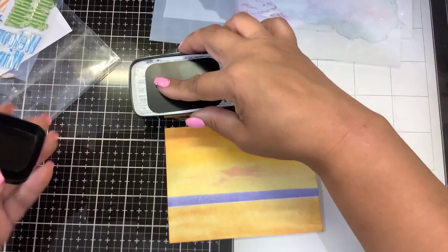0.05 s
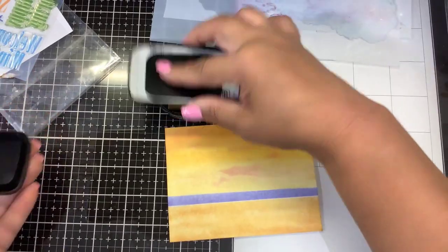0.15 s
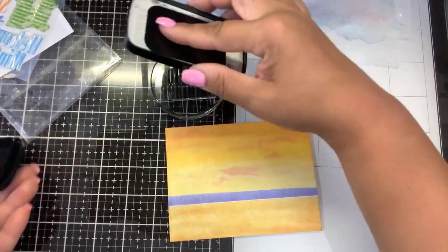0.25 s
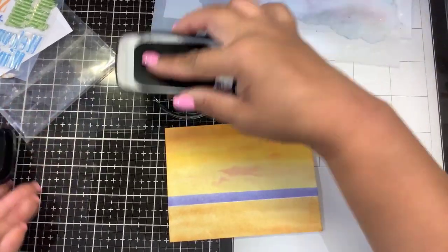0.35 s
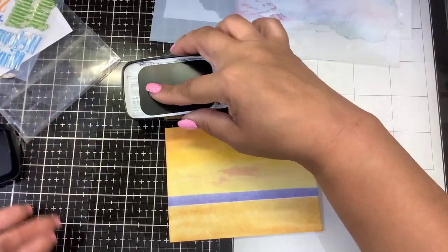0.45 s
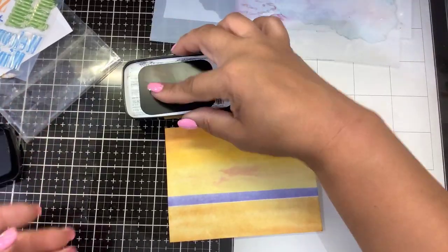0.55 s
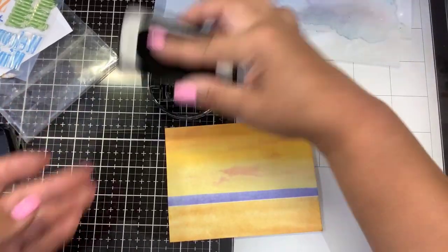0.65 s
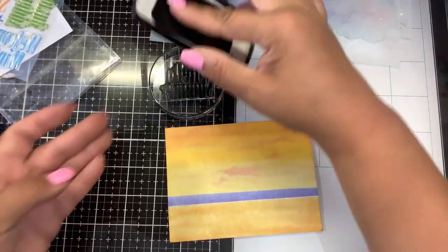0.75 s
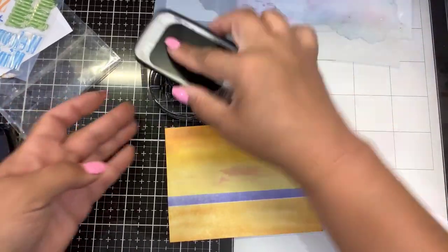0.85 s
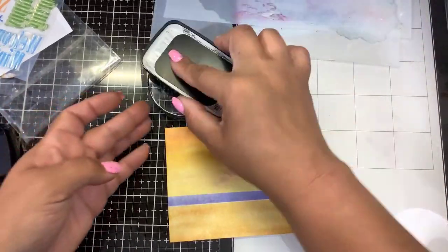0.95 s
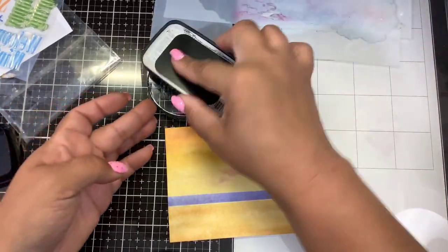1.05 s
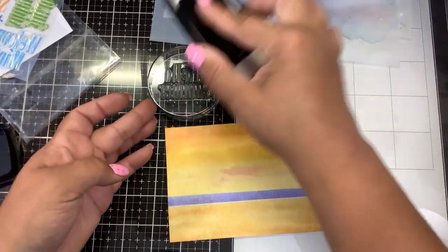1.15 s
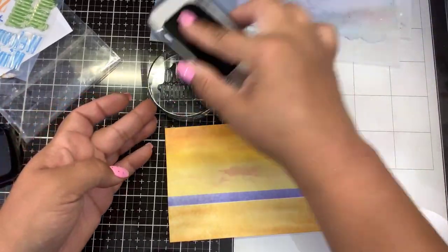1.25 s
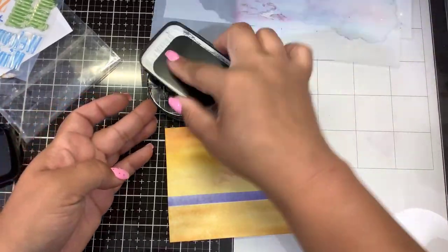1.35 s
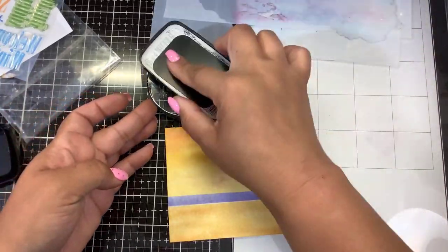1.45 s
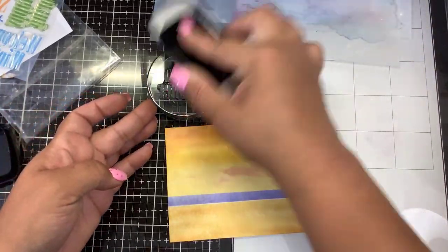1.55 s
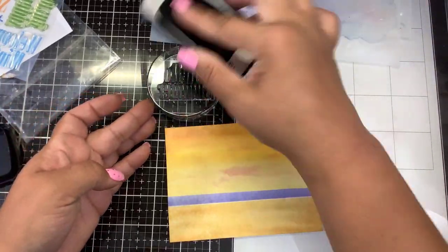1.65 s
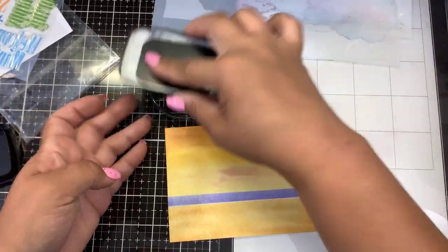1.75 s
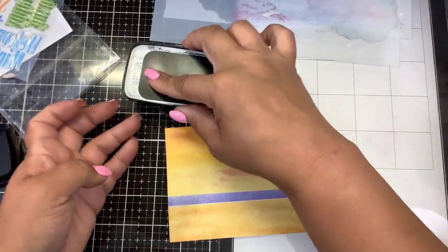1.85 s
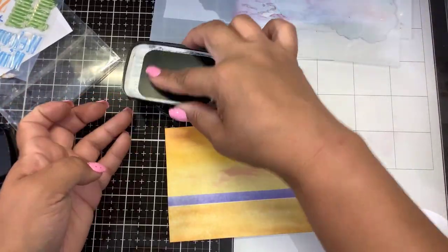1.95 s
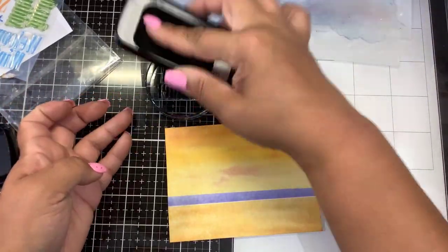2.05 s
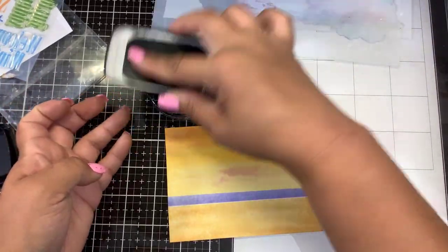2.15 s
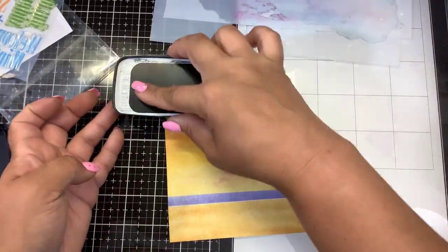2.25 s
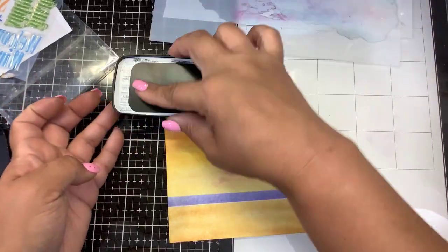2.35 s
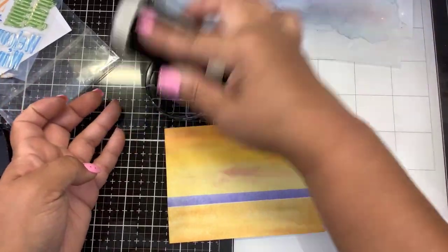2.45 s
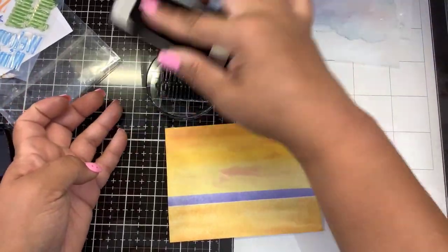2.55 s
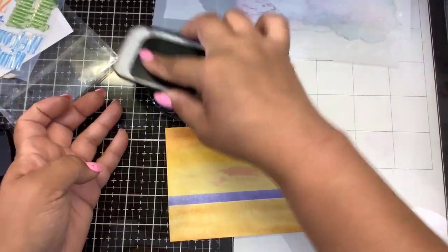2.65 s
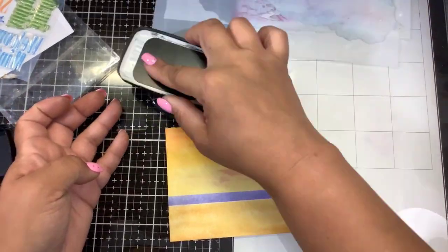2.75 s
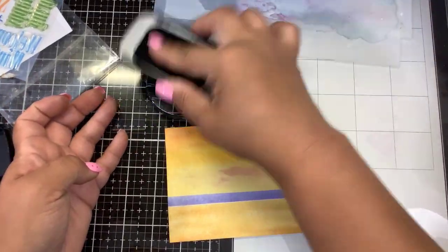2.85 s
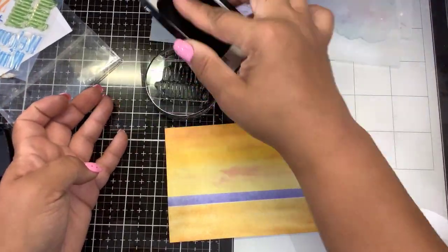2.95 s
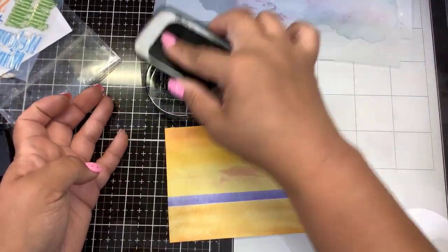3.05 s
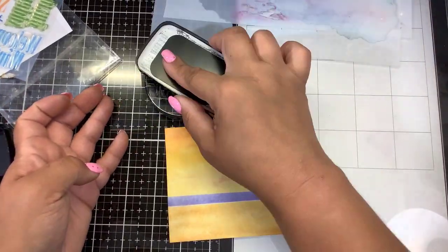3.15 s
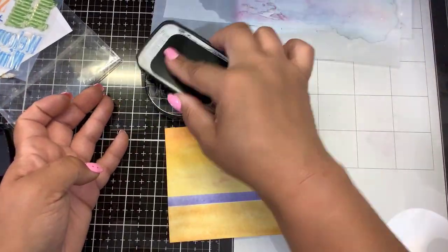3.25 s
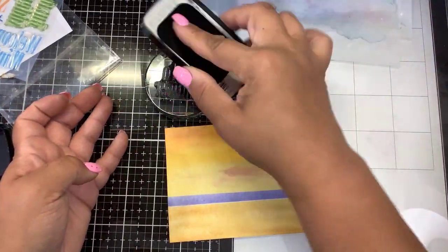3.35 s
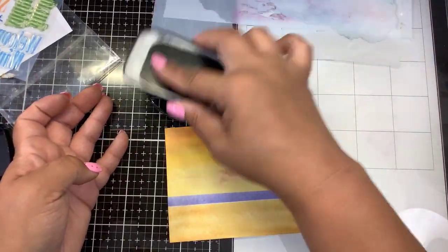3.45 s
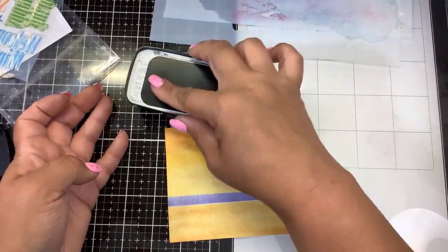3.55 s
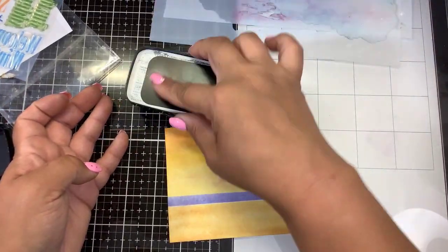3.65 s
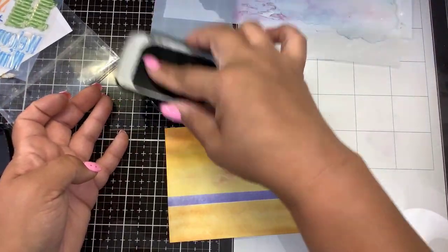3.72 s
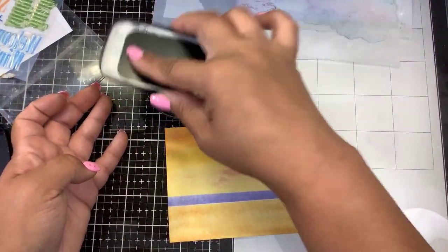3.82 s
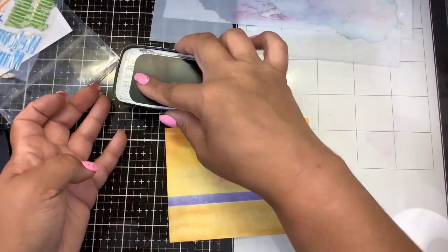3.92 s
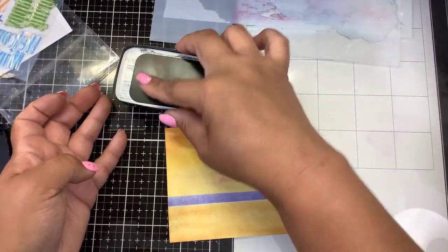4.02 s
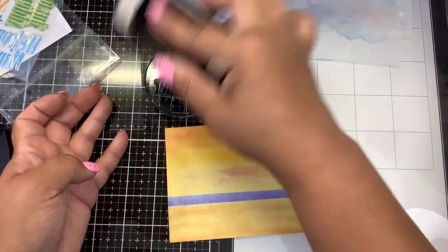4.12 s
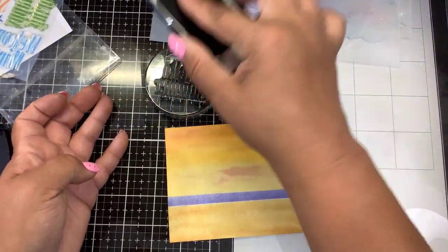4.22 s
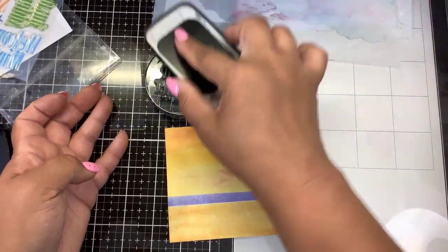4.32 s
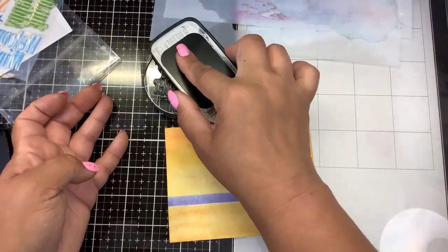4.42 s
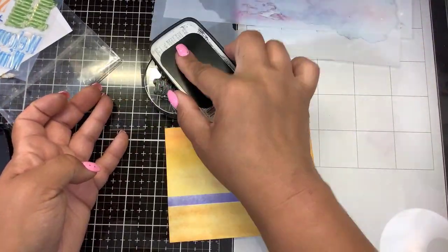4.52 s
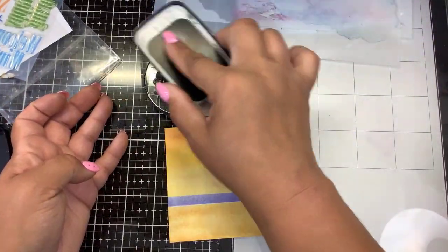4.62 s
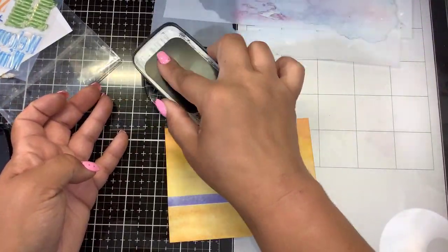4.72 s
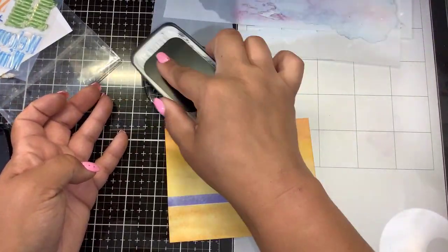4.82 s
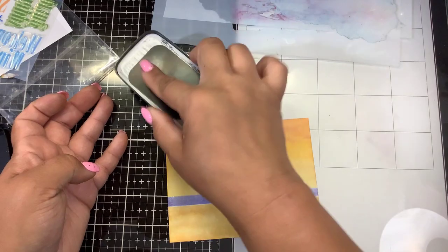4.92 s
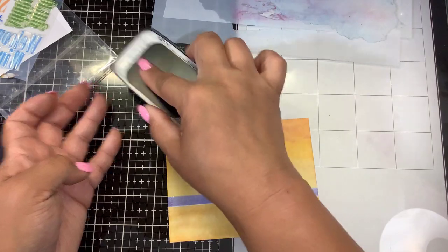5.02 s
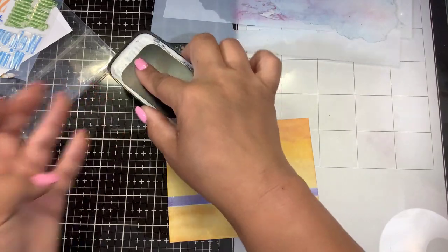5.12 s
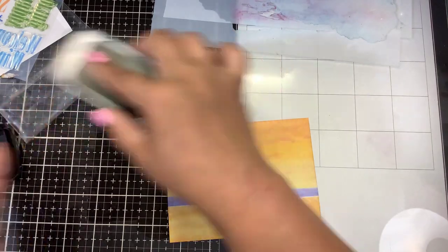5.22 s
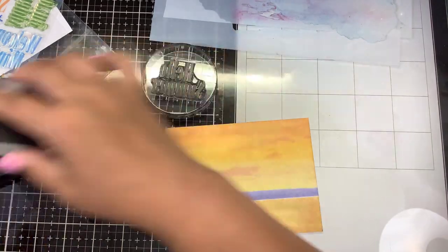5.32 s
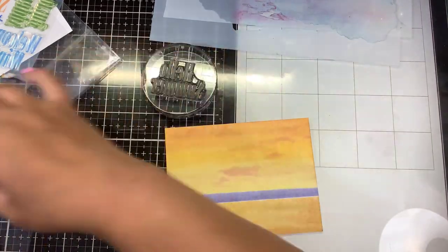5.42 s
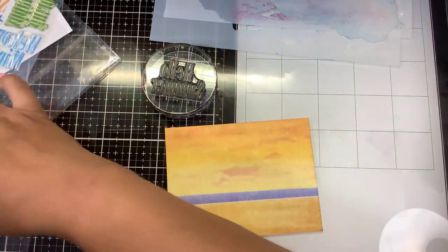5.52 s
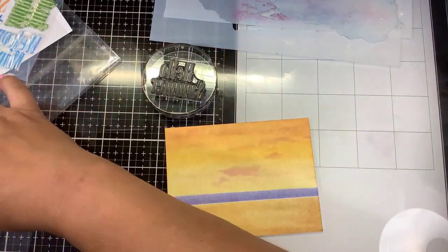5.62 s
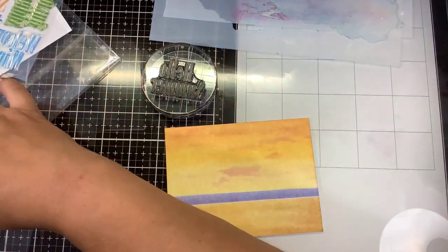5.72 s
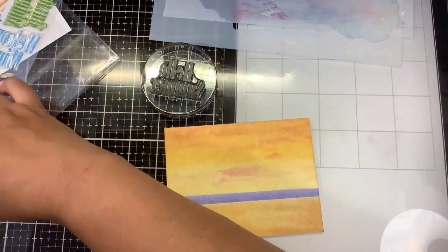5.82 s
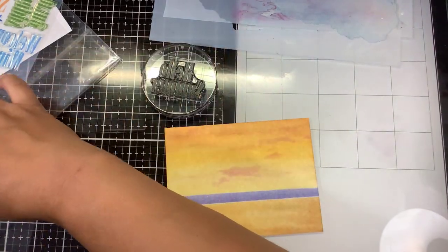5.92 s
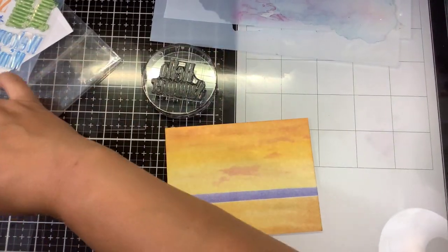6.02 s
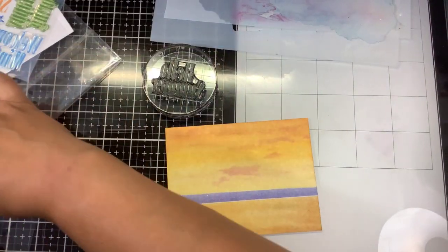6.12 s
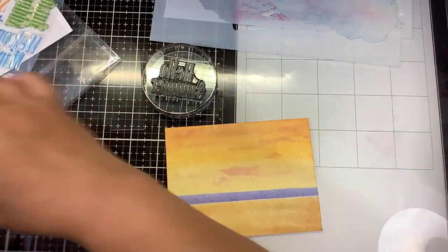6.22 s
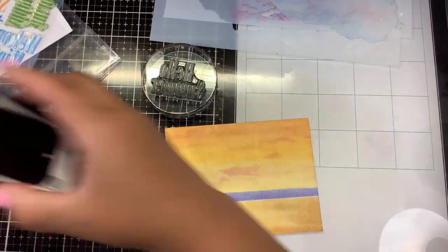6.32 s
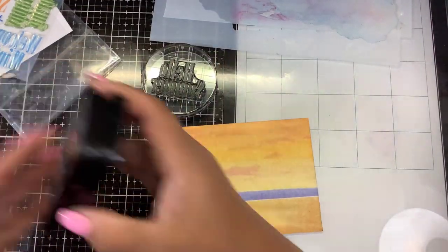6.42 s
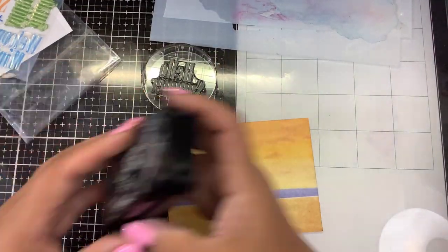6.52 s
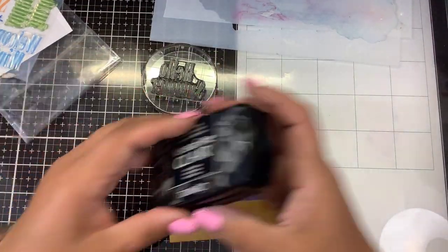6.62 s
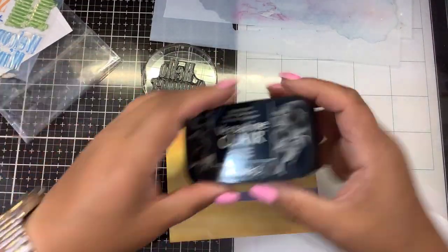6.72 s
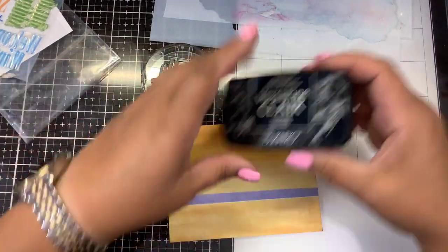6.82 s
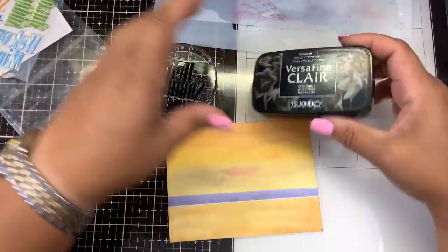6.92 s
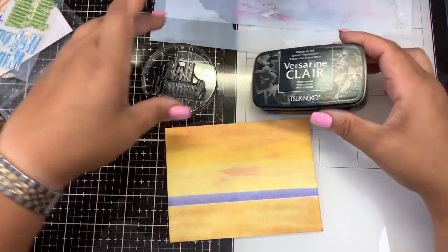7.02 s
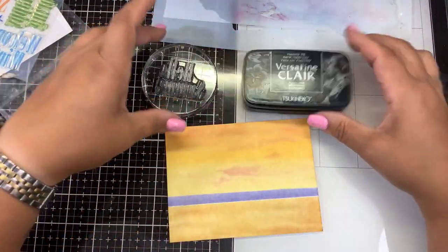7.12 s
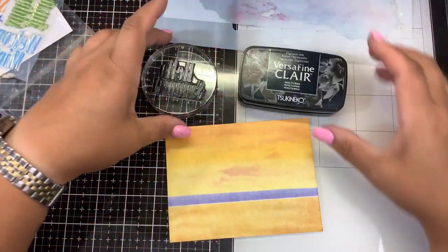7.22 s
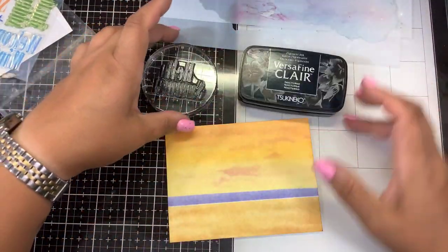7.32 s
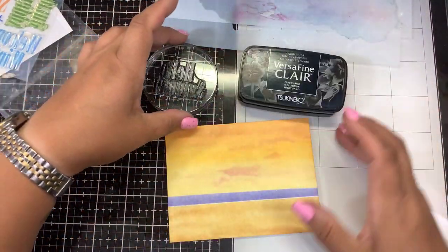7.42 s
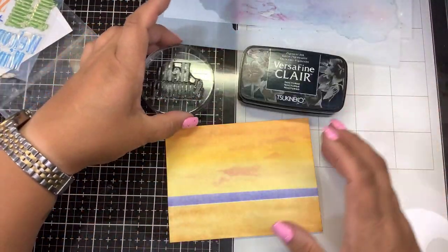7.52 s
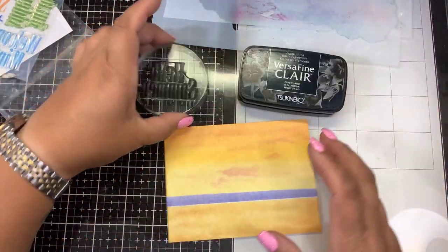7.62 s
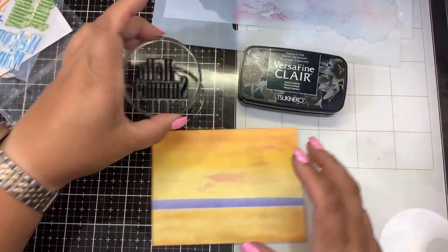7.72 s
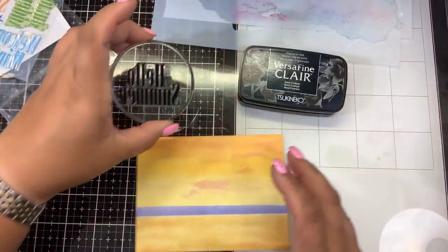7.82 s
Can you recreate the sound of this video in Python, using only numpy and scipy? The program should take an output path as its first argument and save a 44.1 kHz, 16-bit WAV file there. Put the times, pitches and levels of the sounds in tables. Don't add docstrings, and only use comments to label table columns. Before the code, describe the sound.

Soft dull thumps of an ink pad tapping a stamp twice a second, sticky little peels between, then plastic lid clicks and a loud clattering set-down.

```python
import sys
import numpy as np
from scipy import signal
from scipy.fft import rfft, irfft
from scipy.io import wavfile
from scipy.ndimage import uniform_filter1d

SR = 44100
rng = np.random.default_rng(int(sys.argv[2]) if len(sys.argv) > 2 else 0)


def to_linear_factor(level_db):
    exponent = np.asarray(level_db, float) / 20
    return 10 ** exponent


def file_out(sig):
    cols = np.atleast_2d(sig).T
    lim = np.clip(cols, -1, 1)
    pcm = np.round(lim * 32767).astype(np.int16)
    wavfile.write(sys.argv[1], SR, pcm)


N = 346925
T = np.arange(N) / SR

# frequency in Hz, level in dB per Hz.
AIR_COLOUR = [(15, -49.5), (25, -9), (118, -2.5), (142, -15.5), (167, -8.5), (187, -15), (321, -21),
              (524, -28), (669, -27.5), (1250, -29.5), (1360, -29.5), (4020, -34), (5130, -33),
              (15200, -30), (16500, -39.5)]
# start in seconds, thump in dB, hardness in dB per octave.
PAD_TAPS = [(0.0, -34, -4), (0.469, -24.5, -0.3), (0.958, -25, 0), (1.402, -31, -3), (1.842, -30, -1.2),
            (2.273, -26, 1), (2.721, -26.5, -2), (3.157, -30.5, -2.5), (3.543, -33.5, -2),
            (3.943, -22, -0.5), (4.433, -35, -5.7), (4.752, -17, 5), (4.97, -26, -1.5), (5.148, -29, -9.5),
            (5.168, -41, -12)]
# start in seconds, thump in dB, deep sway over thump in dB,
# hardness in dB per octave.
TABLE_JOLTS = [(0.305, -40.5, -20, -12), (1.199, -47.5, -8, -8.5), (1.934, -40.5, -30.5, 5),
               (5.199, -49, 10, -14), (5.8, -47, -9.5, -5), (5.873, -43, -9, 10), (5.963, -26, -25, -5),
               (5.983, -38.5, -25, -10), (7.019, -25, -34.5, 6.5), (7.042, -41.5, -11.5, -2.5),
               (7.189, -29, -23.5, -3), (7.227, -37, -8.5, -1.3), (7.261, -35.5, -13.5, -3),
               (7.701, -59.5, 11, 8.2)]
# frequency in Hz, level in dB, arrival of the crest in ms,
# sharpness as a bare exponent.
BENDING_WAVES = [(50.2, 0, 28, 1.9), (96.6, -10, 24, 3.4), (134.4, -2, 27, 2.3), (163.8, -4, 18, 2.4),
                 (202.3, -0.5, 20, 3.1), (243.7, 9, 10, 7.5), (262.6, -9, 31, 18), (302.6, 1.66, 7.5, 1.7),
                 (412, -6, 8, 2.1), (503, -7, 4.5, 3.1), (603.2, -14.5, 8, 1.2), (679, -14.5, 7, 1.2)]
# start in seconds, fizz in dB, case ring in Hz, length in seconds.
INK_PEELS = [(0.0897, -50, 722, 0.044), (0.136, -38.5, 990, 0.025), (0.1644, -40, 1440, 0.034),
             (0.6197, -39, 1370, 0.032), (1.1017, -44, 690, 0.031), (1.5334, -47.5, 1530, 0.039),
             (1.9959, -42.5, 1390, 0.036), (2.421, -41, 1476, 0.03), (2.8644, -44.5, 1366, 0.03),
             (3.3, -45.5, 1400, 0.024), (3.7144, -41, 1290, 0.019), (4.087, -38, 1200, 0.023),
             (4.5904, -50.5, 1030, 0.036), (4.8536, -43.5, 1480, 0.03), (5.036, -41, 1400, 0.037),
             (5.0844, -43, 705, 0.039), (5.1444, -46.5, 670, 0.065), (5.1971, -55.5, 1260, 0.046),
             (6.1344, -42.5, 690, 0.021), (6.3744, -46, 1270, 0.048), (6.4188, -37.5, 1300, 0.0247),
             (6.566, -50, 1200, 0.059), (6.8294, -50, 627, 0.021), (7.06, -49.5, 564, 0.11)]
# start in seconds, fizz in dB, case ring in Hz, length in seconds.
LID_SCRAPES = [
    (2.305, -58.5, 1670, 0.059),
    (4.742, -62, 882, 0.015),
    (4.858, -57, 1600, 0.033),
    (5.045, -45.5, 1420, 0.027),
    (5.153, -50, 756, 0.024),
    (5.611, -49.5, 730, 0.013),
    (5.772, -50, 704, 0.022),
    (6.14, -53, 740, .035),
]
# frequency in Hz, level in dB per Hz.
INK_COLOUR = [(1180, -15.5), (2000, -20), (3400, -8.5), (5880, -6.5), (9920, -7), (14900, -1), (16000, -26)]
# frequency in Hz, level in dB, 60 dB decay in seconds.
HOLLOW_MODES = [(395, -8.5, 0.062), (522, -0.5, .035), (660, 1, 0.026), (848, -2, 0.035),
                (1050, -4.5, 0.032)]
# frequency in Hz, level in dB, 60 dB decay in seconds.
SHELL_MODES = [(1340, -4.5, .04), (1600, -7.5, 0.028), (1850, -7, 0.024), (2098, -3, 0.028),
               (2300, -4.5, 0.022), (2707, -3, 0.025), (3050, -3.5, 0.027), (3354, -5, 0.018),
               (3910, -3.5, 0.0074)]
# frequency in Hz, level in dB, 60 dB decay in seconds.
BRACELET_MODES = [(4630, -14, .03), (6250, -1.5, 0.054), (7200, -2.5, 0.065), (8130, -1, 0.085),
                  (9950, -4, 0.051)]
# frequency in Hz, level in dB per Hz.
CRACK_COLOUR = [(2060, -32), (3500, -2.5), (4700, 0), (5210, 0), (7420, -3.5), (8340, -2.5), (9320, -2.5),
                (14400, -3.5), (15500, -6.5), (16700, -42)]
# start in seconds, shell in dB, hollow over shell in dB,
# crack over shell in dB, loudest shell pitch in Hz.
LID_CLACKS = [(0.2966, -6, -14.5, -2.5, 2300), (0.334, -8.5, -15, -2, 2200), (0.4442, -12, -9.5, 7, 2650),
              (5.622, -24, -12.5, -8.5, 1800), (5.655, -37, -6, -11.5, 1980), (5.7969, -22, 0.5, -4, 2200),
              (5.8727, -37.5, 11, -5.5, 1380), (5.9454, -28.5, -2, 5, 2680),
              (5.9547, -19.5, -15, -17, 1600), (5.96, -22.5, 4, -0.5, 2050),
              (5.9965, -31.5, -13, 14.5, 2870), (7.3689, -29, -11, 9.5, 2845)]
# start in seconds, shell in dB, hollow over shell in dB,
# crack over shell in dB.
CASE_NICKS = [(0.585, -52.5, -2, -11), (0.9203, -37, -5.5, 8), (1.0038, -46, 0.5, 4),
              (1.1909, -42.5, 5.5, -28), (1.6512, -46, -13, 7), (1.7496, -51, -5, 4.5), (1.924, -34, -5, 2),
              (2.0604, -61, 1, 4), (2.3964, -42.5, -6, 7), (2.4339, -52.5, 3, 5),
              (4.0465, -42.5, -9.5, -2.5), (4.7714, -46, -6.5, 14), (4.9706, -48.5, -1, 12.5),
              (5.1103, -34, -1.5, 1), (5.165, -59.5, 18.5, -3), (6.4916, -60.5, -9.5, 21.5),
              (6.7745, -56, -11, 10)]
# start in seconds, shell in dB, hollow over shell in dB,
# crack over shell in dB.
CASE_KNOCKS = [
    (0.9592, -43.5, 12, 8),
    (1.9892, -46.5, -6, -0.5),
    (4.7521, -28, 4, 6),
    (7.019, -13.5, 3, 3.5),
    (7.0235, -28, -4, 8),
    (7.1815, -17, 0.5, -7.5),
    (7.1835, -9.5, -1.5, -3),
    (7.1865, -7, -16.5, -6),
    (7.2022, -37, 3, 7.5),
    (7.213, -31, -13, -4.5),
]
# start in seconds, shell in dB.
CASE_POPS = [(0.635, -43.5), (1.124, -50.5), (1.55, -53), (1.572, -49.5), (2.005, -47), (2.8397, -55),
             (2.8848, -53), (3.313, -54), (3.7254, -42), (4.0985, -39.5), (4.6073, -46), (4.8601, -43),
             (4.8785, -46.5), (5.0663, -39.5), (5.143, -47), (5.208, -45.5), (5.8216, -42.5), (5.8436, -50),
             (6.1436, -44.5), (6.1594, -50)]
# hollow in dB, crack in dB, shell pitch in Hz, 60 dB decay in seconds.
POP_SOUND = (-2, -1.5, 1385, 0.01)
# start in seconds, shell in dB.
PAD_ROCKS = [
    (7.2247, -26.5),
    (7.261, -25),
    (7.2829, -27.5),
    (7.297, -25),
]
# delay in seconds, level in dB.
ROCK_EDGES = [
    (0, -0.5),
    (0.0063, 2),
    (0.0126, -10.5),
]
# hollow in dB, crack in dB, shell pitch in Hz, 60 dB decay in seconds.
ROCK_SOUND = (-1, -6.5, 2097.5, 0.01)
# start in seconds, level in dB, length in seconds.
LOOSE_RATTLES = [
    (0.345, -47, .02),
    (5.05, -62, 0.047),
    (7.032, -59.5, 0.027),
    (7.189, -41.5, 0.038),
    (7.224, -35, 0.0077),
    (7.242, -44.5, .038),
    (7.262, -39.5, .008),
    (7.283, -37.5, 0.031),
]
# time in seconds, level in dB.
BLOCK_SLIDE = [
    (7.5, -79.5),
    (7.551, -65),
    (7.652, -66),
    (7.656, -62),
    (7.697, -72.5),
    (7.867, -69.5),
]


def unit(x):
    return x / np.max(np.abs(x))


def colour(x, points):
    hz, db = np.transpose(points)
    grid = np.maximum(np.fft.rfftfreq(x.shape[-1], 1 / SR), 1)
    gain = to_linear_factor(np.interp(np.log(grid), np.log(hz), db))
    return irfft(rfft(x) * gain, x.shape[-1])


def band(x, lo_hz, hi_hz):
    return signal.sosfilt(signal.butter(2, [lo_hz, hi_hz], "band", fs=SR, output="sos"), x)


def fade(t, t60):
    return np.exp(-np.log(1000) * t / t60)


def add(out, x, s):
    i = int(s * SR)
    out[i:i + len(x)] += x[:N - i]


def air():
    hiss = colour(rng.standard_normal(N), AIR_COLOUR)
    hiss *= to_linear_factor(-68.5) / np.std(band(hiss, 270, 11000))
    wander = uniform_filter1d(rng.standard_normal((2, N)), size=SR // 8)
    wander /= np.std(wander)
    hum_hz = 121 + 2.2 * wander[1]
    hum = to_linear_factor(-61 + 2.0 * wander[0]) * np.sin(2 * np.pi * np.cumsum(hum_hz) / SR)
    rumble = band(band(rng.standard_normal(N), 54, 76), 54, 76)
    return hiss + np.sqrt(2) * hum + to_linear_factor(-64) * rumble / np.std(rumble)


def table_thumps(table):
    out, t = np.zeros(N), T[:8192]
    chance = rng.standard_normal((len(table), len(BENDING_WAVES), 2)) * [1.2, 0.015]
    grit = rng.standard_normal((len(table), len(t)))
    for (s, db, sway_db, tick_db, hard), c, g in zip(table, chance, grit):
        waves = []
        for (hz, gain, crest_ms, sharp), (a, b) in zip(BENDING_WAVES, c):
            age = t * 1000 / crest_ms
            swell = (age * np.exp(1 - age)) ** sharp
            level = to_linear_factor(gain + a + hard * np.log2(hz / 200))
            waves.append(level * swell * np.sin(2 * np.pi * hz * (1 + b) * t))
        sway, thump = unit(waves[0]), unit(sum(waves[1:]))
        rebound = to_linear_factor(-12) * fade(np.abs(t - 0.018), 0.031) * (t > 0.016)
        tick = colour(g, [(300, -18.5), (1500, -3.5), (3000, -10.5), (16000, -22.5)])
        tick = tick * (fade(t, 0.045) + rebound)
        add(out, to_linear_factor(db) * (thump + to_linear_factor(sway_db) * sway + to_linear_factor(tick_db) * unit(tick)), s)
    return out


def pad_and_jolts():
    pad = [(s, db, -29.5 - (1 - 0.3) * db, -7.5 + 0.95 * min(hard, 0), hard) for s, db, hard in PAD_TAPS]
    jolts = [(s, db, sway_db, -40.5, hard) for s, db, sway_db, hard in TABLE_JOLTS]
    return table_thumps(pad + jolts)


def peels():
    # -10 dB for ink, 4 dB for scrapes
    table = [(*row, -10) for row in INK_PEELS] + [(*row, 4) for row in LID_SCRAPES]
    out, t = np.zeros(N), T[:5120]
    grit = rng.standard_normal((len(table), 2, len(t)))
    size = rng.exponential(size=(len(table), len(t)))
    for (s, db, hz, length, case_db), g, e in zip(table, grit, size):
        pull = np.clip(t / 0.0067, 0, 1) * np.clip((length - t) / 0.005 + 1, 0, 1) ** 2
        patchy = to_linear_factor(5 * unit(uniform_filter1d(g[1], size=200)))
        fizz = colour(g[0] * to_linear_factor(1.0 * e), INK_COLOUR) * pull * patchy
        snaps = g[0] * to_linear_factor(3.0 * e) * pull * patchy
        case = band(snaps, hz / 1.25, hz * 1.4) + to_linear_factor(-8) * band(snaps, 330, 2100)
        add(out, to_linear_factor(db) * unit(fizz) + to_linear_factor(db + case_db) * unit(case), s)
    return out


def ring(modes, t, chance, scatter_db, detune, stretch=1):
    out = 0
    for k, ((hz, db, t60), (a, b)) in enumerate(zip(modes, chance)):
        tone = np.sin(2 * np.pi * hz * (1 + detune * b) * t)
        out = out + (-1) ** k * to_linear_factor(db + scatter_db * a) * fade(t, t60 * stretch) * tone
    return out


def clacks(table):
    out, t = np.zeros(N), T[:4096]
    modes = len(HOLLOW_MODES) + len(SHELL_MODES) + len(BRACELET_MODES)
    chance = rng.standard_normal((len(table), modes, 2))
    grit = rng.standard_normal((len(table), 3, len(t)))
    for (s, db, hollow_db, crack_db, hz, t60), c, g in zip(table, chance, grit):
        t60 = np.clip(t60, 0.008, 0.15)
        chatter = to_linear_factor(-16.0) * g[:2] * (fade(t, 0.35 * t60) + to_linear_factor(-14.5) * fade(t, 2.1 * t60))
        chatter[:, 0] += 1
        near = []
        for f, gain, decay in SHELL_MODES:
            octaves = np.log2(f / hz)
            near.append((f, gain - 8 * abs(octaves) - 7 * max(octaves, 0), decay))
        weight = 0.9 * np.clip(hollow_db, -14, 0)
        heavy = [(f, gain + weight * max(np.log2(650 / f), 0), decay) for f, gain, decay in HOLLOW_MODES]
        hollow = ring(heavy, t, c, 1.5, 0.02, t60 / 0.045)
        hollow = signal.fftconvolve(chatter[0], hollow)[:len(t)]
        shell = ring(near, t, c[len(HOLLOW_MODES):], 1.6, 0.02, t60 / 0.075)
        shell = signal.fftconvolve(chatter[1], shell)[:len(t)]
        burst = np.clip(t / 0.00039, 0, 1) * (fade(t, 0.62 * t60) + to_linear_factor(-11.0) * fade(t, 2.2 * t60))
        crack = unit(colour(g[2], CRACK_COLOUR) * burst)
        metal = unit(ring(BRACELET_MODES, t, c[-len(BRACELET_MODES):], 3.3, 0.02))
        crack = crack + to_linear_factor(min(crack_db, 12) - 27.0) * metal
        add(out, to_linear_factor(db) * (to_linear_factor(hollow_db) * unit(hollow) + unit(shell) + to_linear_factor(crack_db) * crack), s)
    return band(band(out, 260, 19000), 260, 19000)


def struck(table, t60):
    return [(s, db, hollow_db, crack_db, 2100 * 2 ** (min(crack_db, 12) / 46 - hollow_db / 71), t60)
            for s, db, hollow_db, crack_db in table]


def plastic_blows():
    lid = [(*row, 0.043) for row in LID_CLACKS]
    nicks, knocks = struck(CASE_NICKS, 0.043), struck(CASE_KNOCKS, 0.021)
    pops = [(s, db, *POP_SOUND) for s, db in CASE_POPS]
    rocking = [(s + after, db + edge_db, *ROCK_SOUND) for s, db in PAD_ROCKS for after, edge_db in ROCK_EDGES]
    return clacks(lid + nicks + knocks + pops + rocking)


def rattles():
    loose = np.zeros(N)
    for s, db, length in LOOSE_RATTLES:
        loose += to_linear_factor(db) * (T > s) * fade(np.clip(T - s - length, 0, 1), 0.036)
    touch = (rng.random(N) < 750 / SR) * rng.standard_normal(N)
    touch = touch * to_linear_factor(2.4 * rng.exponential(size=N)) * loose
    t, chance = T[:int(0.05 * SR)], rng.standard_normal((len(SHELL_MODES), 2))
    hollow = unit(ring(HOLLOW_MODES, t, chance, 1.5, 0.02, 0.6))
    shell = unit(ring(SHELL_MODES, t, chance, 0.53, 0.0089, 0.35))
    crack = unit(colour(rng.standard_normal(len(t)), CRACK_COLOUR) * fade(t, 0.012))
    body = to_linear_factor(2) * hollow + shell + to_linear_factor(-3) * crack
    return band(signal.fftconvolve(touch, body)[:N], 300, 19000)


def slide():
    s, db = np.transpose(BLOCK_SLIDE)
    points = [(400, -18), (1100, -10.0), (1400, -6.0), (1800, -11), (3000, -10), (7000, -15.5)]
    rub = colour(rng.standard_normal(N), points)
    return rub / np.std(rub) * to_linear_factor(np.interp(T, s, db, left=-120))


def room(x):
    t = T[:int(0.5 * SR)]
    tail = colour(rng.standard_normal(len(t)), [(100, -1), (600, -2.0), (4000, -7.5), (16000, -8)])
    tail = tail * fade(t, 0.13) * (t > 0.004)
    return to_linear_factor(-17.5) * signal.fftconvolve(x, tail / np.sqrt(np.sum(tail ** 2)))[:N]


def scene():
    desk = pad_and_jolts() + peels() + plastic_blows() + rattles() + slide()
    return (desk + room(desk) + air())[None]


def band_limit(x):
    return signal.sosfilt(signal.butter(12, 16820, fs=SR, output="sos"), x)


def record(dry):
    top = signal.ellip(10, 0.2, 80, 16700, fs=SR, output="sos")
    mix = signal.sosfilt(top, dry)
    return band_limit(mix)


dry = scene()
out = record(dry)
file_out(out)
```